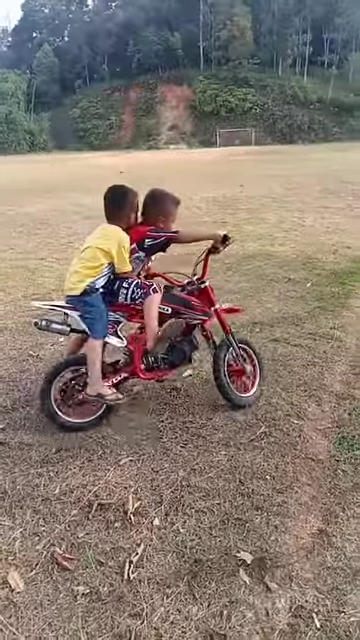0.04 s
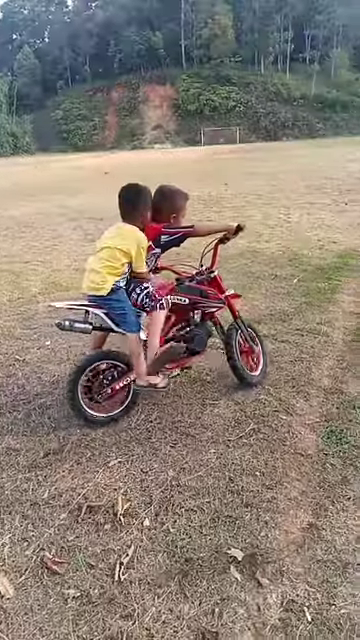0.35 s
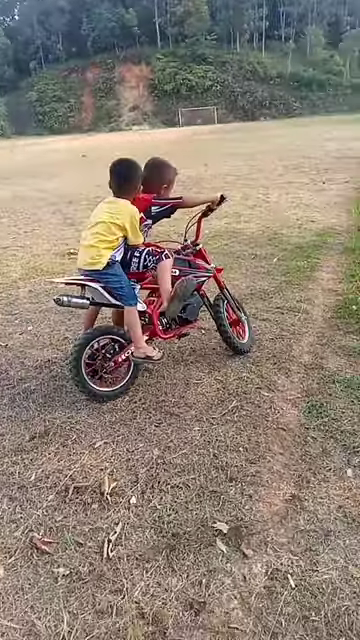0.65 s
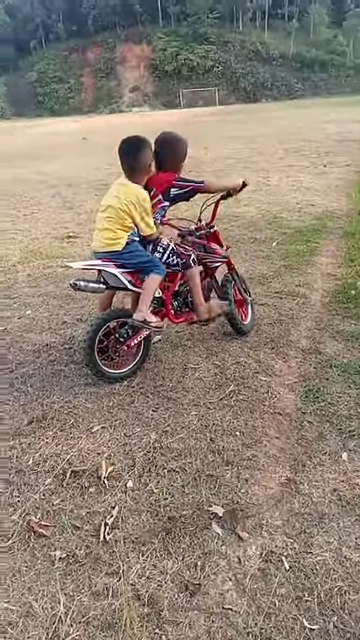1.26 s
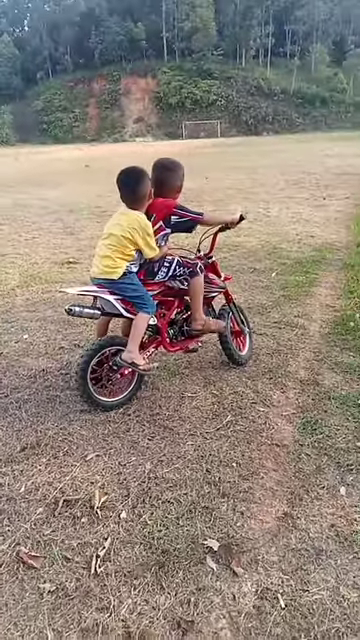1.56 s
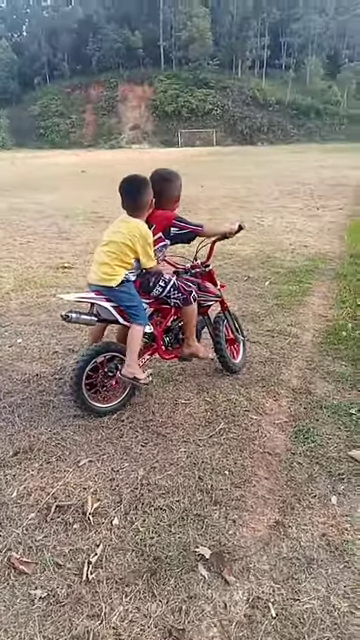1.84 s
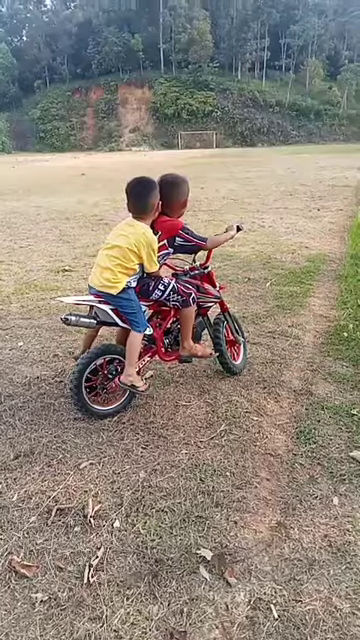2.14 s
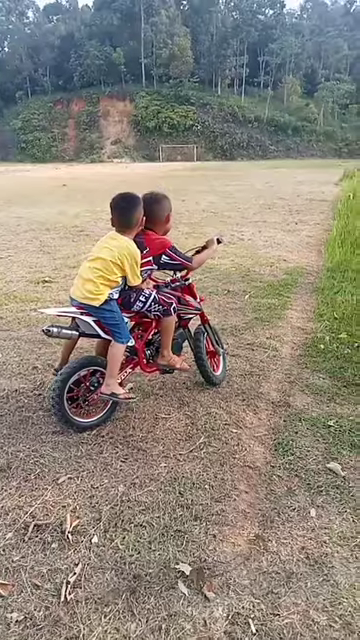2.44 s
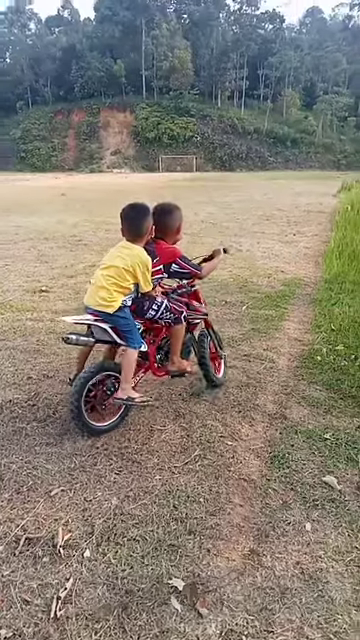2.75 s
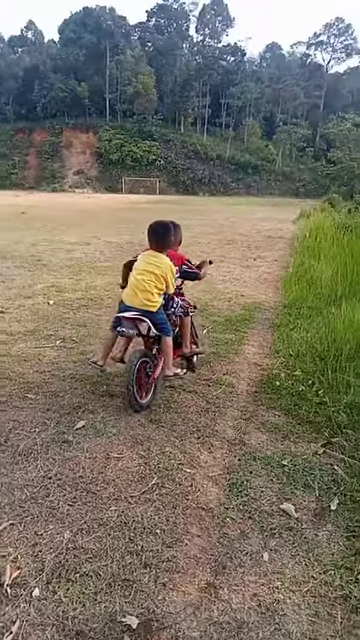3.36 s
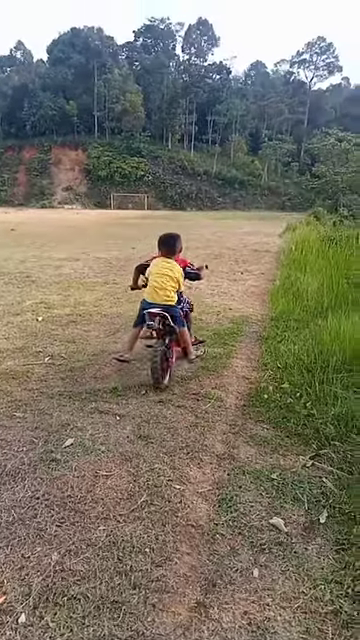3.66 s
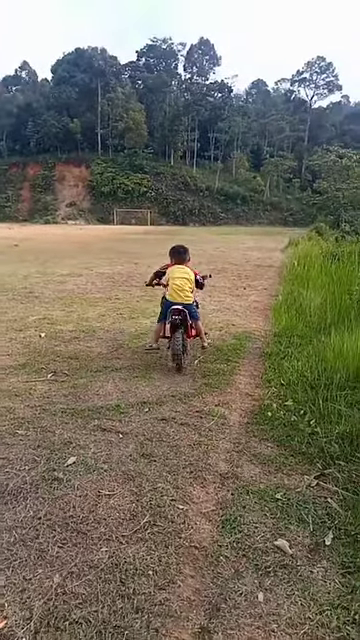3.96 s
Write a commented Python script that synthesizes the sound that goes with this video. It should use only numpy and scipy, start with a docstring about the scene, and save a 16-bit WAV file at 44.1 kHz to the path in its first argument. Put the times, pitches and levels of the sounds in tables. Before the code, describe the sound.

A small two-stroke motorbike idles unevenly, speeds up with sharp pops and rides off buzzing.

```python
"""A small two-stroke motorbike putters at idle near the microphone, on an open field. Each crank turn
puffs the exhaust pipe, hoots in the intake and shakes the casing. The throttle opens and stray firings
crack on every second or third turn; then it fires on every turn and drones away, turning its tail to
the microphone. The field scatters a little of the sound back, over a low rumble of air."""
import sys
import numpy as np
from scipy import signal
from scipy.fft import rfft, irfft
from scipy.io import wavfile
from scipy.ndimage import uniform_filter1d

SR = 44100
rng = np.random.default_rng(int(sys.argv[2]) if len(sys.argv) > 2 else 0)


def log_audio(samples):
    """Write samples as a 16-bit WAV file to the path given in sys.argv[1]."""
    # one column per channel
    frames = np.atleast_2d(samples).T
    # limit to full scale, then quantise
    limited = np.clip(frames, -1, 1)
    pcm = np.round(limited * 32767).astype(np.int16)
    wavfile.write(sys.argv[1], SR, pcm)


N = 176400
T = np.arange(N) / SR
REV_RANGE_HZ = (50, 78.6)  # crank speeds between which the exhaust goes from idle to revved colour
REVVED_SCATTER_DB = -.62  # scales the random unevenness from turn to turn

# Single firings, near the microphone: t/s, relative level/dB
FIRINGS = [(.2344, -11.5), (.3546, -9.5), (.4115, -5.5), (.6823, -6.5), (.7602, -10), (1.3004, -13),
           (1.559, -10), (1.7918, -4.5), (1.8327, -6), (1.8716, -1), (1.9085, -3), (1.943, -4.5),
           (1.9735, -3.5), (2.0007, -1.5), (2.0252, -1.5), (2.0483, 0), (2.0928, -9), (2.1144, -1.5),
           (2.1468, -.5), (2.1789, -1), (2.2112, -.5), (2.2443, 1), (2.2773, .5), (2.3099, -2),
           (2.3313, -.5), (2.3528, -1), (2.3742, 0), (2.3956, -2), (2.4168, -3), (2.4378, -3),
           (2.4586, -3.5), (2.4794, -4.5), (2.4998, -9), (2.5205, -8)]
# Echoes inside the silencer: lag/s, level/dB
SILENCER_ECHOES = [(.0033, -6.5), (.0098, -6.5)]
# Colour of a firing's body and of its treble: f/Hz, level/dB
CRACK_BODY = [(50, -11.5), (180, 7), (420, -2), (700, 2.5), (950, -6), (1200, 3), (1380, -8), (1610, 3.5),
              (1800, -9.5), (2100, -13.5), (2550, -5.5), (3100, -10.5), (3450, -2), (3820, -8),
              (4150, -4.5), (4450, -18.5), (4950, -25), (5250, -31), (12000, -47.5)]
CRACK_TREBLE = [(2500, 7), (4900, -6.5), (6200, 0), (8000, 3), (9300, 0.5), (10600, 11.5), (12000, -9),
                (15500, -42)]
def firings(speed):
    """A pressure step echoes along the silencer and gas hisses after it; brighter at speed."""
    times, db = np.array(FIRINGS).T
    blow = pulses(times + .001, amp(db))
    echoes = sum(pulses(times + .001015 + lag, amp(db + loss)) for lag, loss in SILENCER_ECHOES)
    def gas(decay_s):
        hiss = signal.sosfilt(signal.butter(2, 1930, "high", fs=SR, output="sos"), noise())
        return amp(-5.5) * hiss * (fade(blow, decay_s) + amp(-6.5) * fade(blow, .0082))
    body = ring(3.74 * (blow + echoes) + gas(decay_s=.0022), CRACK_BODY, smear_s=.001994)
    treble = ring(3 * blow + gas(decay_s=.0013), CRACK_TREBLE)
    treble_db = np.interp(speed, REV_RANGE_HZ, (-25.5, -19.5))
    return amp(-3.5) * body + amp(treble_db) * treble


# Firing on every turn, riding off: t/s, pipe level/dB, rasp level/dB, spit level/dB
RIDE_LEVELS = [(1.98, -27.5, -60, -70), (2.1, -24.5, -37, -62), (2.3, -39, -32, -75),
               (2.48, -25.5, -30, -59), (2.57, -20.5, -25, -45), (2.75, -21.5, -24, -44.5),
               (2.92, -21.5, -29.5, -49.5), (3.07, -23, -36, -50.5), (3.28, -24, -28.5, -43),
               (3.5, -26.5, -31.5, -40.5), (3.7, -26.5, -29, -41.5), (3.95, -28, -31, -45.5)]
# The bike as the microphone sees it: t/s, heading (0 side on, 1 oblique, 2 from behind)
HEADING = [(2.68, 0.3), (2.9, 0.95), (3.25, 1.21), (3.45, 1.8), (3.8, 1.95)]
def ride_away(times, turns, speed):
    """Under load the exhaust drones, rasps and spits, changing colour as the tail turns our way."""
    side = np.clip(1 - curve(HEADING), 0, 1)
    behind = np.clip(curve(HEADING) - 1, 0, 1)
    pipe = pipe_drone(times, speed, side, behind) * amp(curve(RIDE_LEVELS))
    rasp = shell_rasp(times, turns, speed, behind) * amp(curve(RIDE_LEVELS, column=2))
    spit = gas_spit(times, speed) * amp(curve(RIDE_LEVELS, column=3))
    return (pipe + rasp + spit) * (T > RIDE_LEVELS[0][0])


DRONE_HZ = 97.94
# The pipe from three microphone angles: level/dB at 1, 2, 3 ... times DRONE_HZ
PIPE_SIDE_ON = [-3, -1, -5, -7, -4, -4, -13, -4, -10, -9, -15, -8, -6, -9, -7, -6, -4, -9]
PIPE_OBLIQUE = [-3, -4, -7, -12, -10, -4, -13, 0, -7, -14, -22, -12, -8, -10, -7, -2, -7, -20, -22, -18]
PIPE_BEHIND = [0, -6, -3, -16, -23, -11, -10, -10, -8, -17, -26, -8, -4, -11, -7, 0, -3, -16, -9, -4, -10,
               -12]
def pipe_drone(times, speed, side, behind):
    """One push a turn sounds the pipe's overtones; the midrange swells briefly on the way out."""
    push = strokes(times - .00149, speed, REVVED_SCATTER_DB) + amp(-24) * noise()
    def pipe(levels):
        overtones = [(k * DRONE_HZ, db) for k, db in enumerate(levels, 1)]
        return -ring(push, [(40, -67), *overtones, (2450, -42), (6000, -83.5)], smear_s=.003052)
    oblique = 1 - side - behind
    tone = side * pipe(PIPE_SIDE_ON) + oblique * pipe(PIPE_OBLIQUE) + behind * pipe(PIPE_BEHIND)
    midrange = signal.lfilter(*signal.iirpeak(870, Q=5, fs=SR), tone)
    return tone + 1.6 * bump(T - 3.42, width=.17) * midrange


# Silencer shell, heard from the side and from behind: f/Hz, level/dB
SHELL_SIDE = [(900, -20), (1800, -3.5), (2400, -2.5), (2950, 3.5), (3550, -1), (4150, -5.5), (4500, -20.5),
              (5650, -25.5), (6200, -29), (8000, -25), (12000, -49)]
SHELL_BEHIND = [(1000, -24), (1950, 1.5), (2430, -9), (3200, -3.5), (3500, 6.5), (3680, -4), (4400, -18.5),
                (12000, -46)]
def shell_rasp(times, turns, speed, behind):
    """Each firing rasps the silencer shell, heard directly and mirrored by the ground."""
    shell = (noise() * np.exp(-T / .005))[:SR // 10]
    hits = unit(signal.fftconvolve(strokes(times, speed, scatter_db=.6), shell)[:N])
    buzz = unit(hits + unit(noise() * np.exp(-(turns % 1))))
    direct = (1 - behind ** 2) * ring(buzz, SHELL_SIDE) + behind ** 2 * ring(buzz, SHELL_BEHIND)
    # the ground bounce lags less with distance, so its bands slide upward
    lag_s = .00397 * np.exp(-.09 * T)
    return direct - .45 * np.interp(T - lag_s, T, direct)


# Gas jet at the tailpipe: f/Hz, level/dB
SPIT_COLOUR = [(3000, -26), (7000, -20.5), (9000, -17.5), (10000, -1.5), (10800, -3.5), (13000, -24),
               (15500, -27)]
def gas_spit(times, speed):
    """Gas spits out once a turn: a click and a short hiss."""
    jet = strokes(times + .00072, speed, REVVED_SCATTER_DB)
    hiss = noise() * (fade(jet, .0008) + .24 * fade(jet, .0054))
    return ring(unit(4 * jet + hiss), SPIT_COLOUR)


# Exhaust puffs before the bike rides off: t/s, level/dB
PUFF_LEVELS = [(0, -38.5), (.7, -35.5), (1.1, -38), (1.76, -33), (1.8, -30), (1.87, -27.5), (1.895, -32.5),
               (2.02, -27), (2.48, -24), (2.58, -48)]
# The pipe at idle and revved: f/Hz, level/dB
PIPE_IDLE = [(30, -36), (60, -1), (110, -3.5), (226, 1), (400, -13), (900, -26.5), (6000, -90)]
PIPE_REVVED = [(30, -49), (92, -8), (135, 6), (184, 3.5), (215, -6), (680, -1), (1200, -10.5), (2200, -60),
               (6000, -86)]
def exhaust_puffs(times, speed):
    """Coasting turns puff softly into the pipe, whose colour follows the crank speed."""
    opened = np.interp(speed, REV_RANGE_HZ, (0, 1))
    idle = ring(strokes(times, speed, scatter_db=2.5), PIPE_IDLE)
    revved = ring(strokes(times, speed, REVVED_SCATTER_DB), PIPE_REVVED)
    return -((1 - opened) * idle + opened * revved) * amp(curve(PUFF_LEVELS))


# Intake: t/s, level/dB, place in the turn (0-1), pitch ratio, upper tone against lower/dB
INTAKE = [(0, -32.5, 0.56, 0.97, -6.5), (1.46, -31.5, 0.57, 0.98, -1.5), (1.5, -26.5, 0.59, 0.97, 0),
          (1.7, -25, 0.76, .95, 1.5), (1.85, -26, 0.83, 1.005, -3.5), (1.92, -43, 0.72, 0.94, 1),
          (2.1, -29, .85, 0.995, 17), (2.52, -22, 0.81, 0.99, 15), (2.8, -29.5, 0.82, 0.99, 5),
          (4, -38, 0.7, 0.78, 24)]
def intake_hoot(turns, speed, low_hz=1093, high_hz=1619, rise_per_s=13.4):
    """Once a turn the intake draws air and hoots on two rising tones."""
    cycle = turns - curve(INTAKE, column=2) + .5
    hoot_index = np.floor(cycle).astype(int) + 2
    off_centre = cycle % 1 - .5  # in turns
    hoot_time = off_centre / speed * curve(INTAKE, column=3)
    def tone(hz):
        slip, size = rng.standard_normal((hoot_index.max() + 1, 2))[hoot_index].T
        phase = 2 * np.pi * hz * hoot_time * (1 + rise_per_s * hoot_time / 2)
        return amp(1.97 * size) * np.sin(phase + .99 * slip)
    upper = amp(curve(INTAKE, column=4))
    both = (tone(low_hz) + upper * tone(high_hz)) / np.hypot(1, upper)
    return unit(both * bump(off_centre, width=.14)) * amp(curve(INTAKE))


# Weak firings at idle: t/s
PUTT_TIMES = [.119, .209, .389, .443, .549, .66, .713, .739, .792, .845, .982, 1.068]
def putts(hz=226):
    """Weak firings thump roundly at the pipe's lowest resonance."""
    thumps = (np.cos(2 * np.pi * hz * (T - at)) * bump(T - at, width=.0046) for at in PUTT_TIMES)
    return amp(-24) * sum(thumps)


# Rattle at the microphone, fading as the bike leaves: t/s, level/dB
RATTLE_LEVELS = [(0, -33), (1.45, -35), (1.9, -29), (2.05, -24.5), (2.5, -27), (2.62, -32.5), (4, -44)]
# Engine casing: f/Hz, level/dB
CASING = [(40, -36), (150, 1), (600, 2), (850, 0), (1850, -2.5), (2420, -0.5), (2650, -4), (3150, -3.5),
          (3320, -0.5), (3560, -9.5), (3950, -1.5), (4600, -22.5), (7800, -30.5), (9300, -40), (10800, -26),
          (12500, -55), (15500, -58)]
def casing_rattle(turns):
    """Piston and casing rattle in step with the crank, and the fins ring briefly."""
    grain = unit(uniform_filter1d(noise(), size=90))
    shake = np.exp(.14 * np.cos(2 * np.pi * (turns - .12)) + .37 * grain)
    metal = np.diff(noise() * np.exp(-T / .0068))[:SR // 10]
    fins = unit(ring(signal.fftconvolve(noise() * shake, metal)[:N], CASING))
    casing = ring(unit(noise() * shake), CASING)
    return (.92 * casing + .5 * fins) * amp(curve(RATTLE_LEVELS))


# Modes of the frame: f/Hz, relative level/dB, t60/s
FRAME_MODES = [(1980, 6.5, 0.043), (2200, 3, 0.051), (543, -1, 0.039)]
def frame_clank(at_s):
    """A loose part strikes the frame and rings."""
    age = np.maximum(T - at_s, 0)
    tones = sum(amp(db - 60 * age / t60) * np.sin(2 * np.pi * hz * age) for hz, db, t60 in FRAME_MODES)
    strike = ring(noise() * (age > 0) * np.exp(-age / .015), CASING)
    return amp(-23.5) * (tones + strike)


def whine(at_s, centre_hz=3210, rise_hz_per_s=4300, gap_hz=270):
    """A faint, rough metallic whine of two close tones slides upward once."""
    def rough():
        return unit(signal.sosfilt(signal.butter(2, 45, fs=SR, output="sos"), noise()))
    def tone(hz):
        return np.real((rough() + 1j * rough()) * np.exp(2j * np.pi * np.cumsum(hz) / SR))
    lower_hz = centre_hz + rise_hz_per_s * (T - at_s)
    return amp(-40) * (tone(lower_hz) + .5 * tone(lower_hz + gap_hz)) * bump(T - at_s, width=.065)


def field_scatter(bike, decay_s=.04):
    """The open field scatters a short, faint tail back to the microphone."""
    scatter = noise() * np.exp(-T / decay_s)
    return amp(-21) * signal.fftconvolve(bike, scatter / np.linalg.norm(scatter))[:N]


def open_air():
    """Air rumbles faintly around the microphone."""
    return amp(-62) * ring(noise(), [(20, 1), (80, 23), (1000, -39), (12000, -50)])


def amp(db):
    """Decibels to gain."""
    return 10 ** (np.asarray(db) / 20)


def curve(table, column=1):
    """One column of a table, joined by straight lines in time."""
    rows = np.array(table, float)
    return np.interp(T, rows[:, 0], rows[:, column])


def unit(x):
    """Scale to rms 1."""
    return x / np.sqrt(np.mean(x ** 2) + 1e-18)


def noise():
    """White noise."""
    return rng.standard_normal(N)


def bump(x, width):
    """Bell curve around x = 0."""
    return np.exp(-.5 * (x / width) ** 2)


def ring(x, colour, smear_s=0, size=4096):
    """Pass through a causal body of the given colour (f/Hz, level/dB); smear delays the lows."""
    hz, db = np.array(colour, float).T
    f = np.arange(size // 2 + 1) * SR / size
    cepstrum = irfft(np.log(amp(np.interp(np.log(f + 1), np.log(hz), db))))
    cepstrum[1:size // 2] *= 2  # fold to minimum phase
    cepstrum[size // 2 + 1:] = 0
    phase_lag = 2 * np.pi * smear_s * np.cumsum(np.exp(-f / 1500)) * SR / size
    response = irfft(np.exp(rfft(cepstrum) - 1j * phase_lag))
    return signal.fftconvolve(x, response / np.linalg.norm(response))[:N]


def pulses(times, sizes, order=8):
    """Band-limited clicks at the given times."""
    at = times[:, None] * SR
    taps = at.astype(int) + np.arange(-order, order + 1)
    shape = np.sinc(taps - at) * np.sinc((taps - at) / (order + 1)) * sizes[:, None]
    return np.bincount(np.clip(taps, 0, N).ravel(), shape.ravel(), N + 1)[:N]


def fade(x, seconds):
    """Give every click an exponential tail."""
    return signal.lfilter([1], [1, -np.exp(-1 / (SR * seconds))], x)


def strokes(times, speed, scatter_db):
    """One uneven pulse per turn, with a mean power near 1."""
    return pulses(times, amp(scatter_db * rng.standard_normal(len(times)))) * np.sqrt(SR / speed)


# Crank speed, from idle to riding off: t/s, f/Hz
CRANK_SPEED = [(0.0, 37.29), (0.3, 31.31), (0.4, 37.99), (0.6, 35.89), (0.7, 38.45), (1.3, 32.26),
               (1.6, 38.6), (1.7, 47.8), (1.8, 43.69), (1.85, 53.74), (1.9, 52.83), (2.0, 76.46),
               (2.05, 92.71), (2.1, 87.48), (2.15, 96.24), (2.2, 90.08), (2.5, 97.25), (2.6, 94.93),
               (2.7, 98.37), (2.8, 97.11), (3.1, 97.77), (4.0, 96.82)]
def scene():
    """The bike and the field around it, at one microphone."""
    speed = curve(CRANK_SPEED)
    turns = np.cumsum(speed) / SR - .2  # the exhaust port opens on each whole number
    times = np.interp(np.arange(int(turns[-1]) + 1), turns, T)
    bike = exhaust_puffs(times, speed) + casing_rattle(turns) + intake_hoot(turns, speed)
    bike += putts() + whine(at_s=.95) + firings(speed)
    bike += ride_away(times, turns, speed) + frame_clank(at_s=1.228)
    return (bike + field_scatter(bike) + open_air())[None]


def record(dry, top_hz=15750):
    """The phone's microphone rounds the loudest peaks and cuts the top."""
    rounded = np.tanh(.77 * dry) / .84
    return signal.sosfilt(signal.ellip(8, .2, 80, top_hz, fs=SR, output="sos"), rounded)


dry = scene()
out = record(dry)
log_audio(out)
```